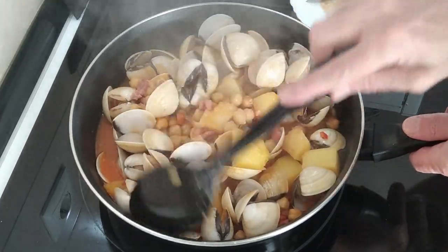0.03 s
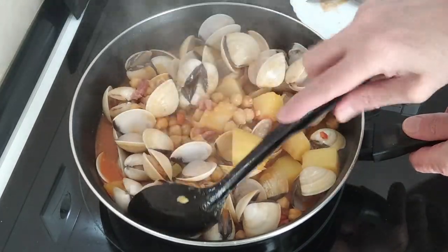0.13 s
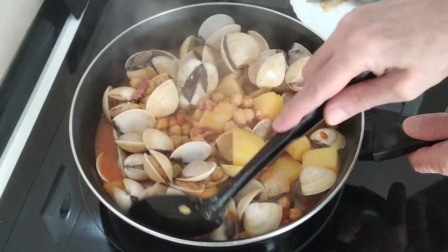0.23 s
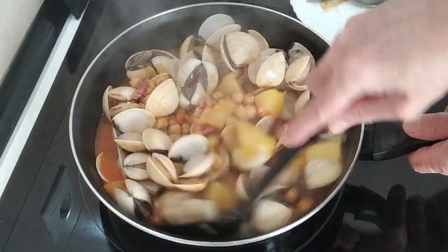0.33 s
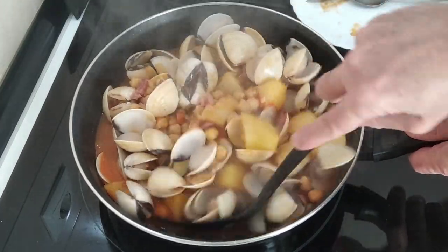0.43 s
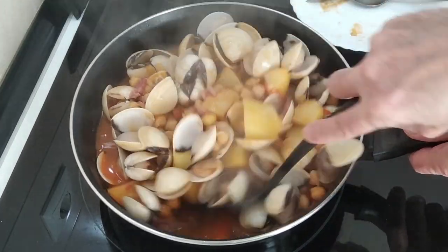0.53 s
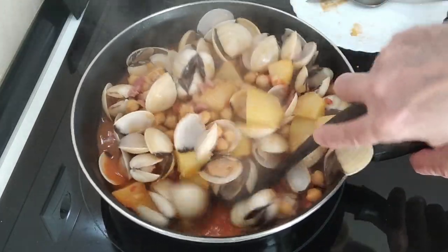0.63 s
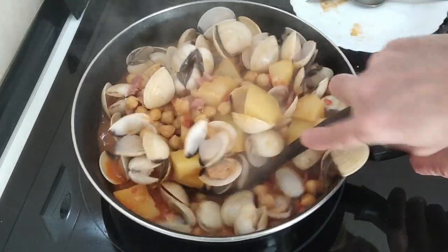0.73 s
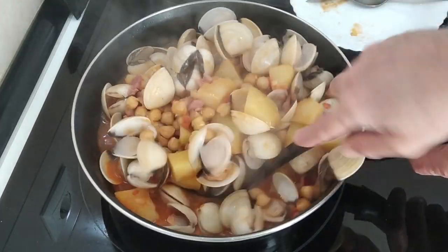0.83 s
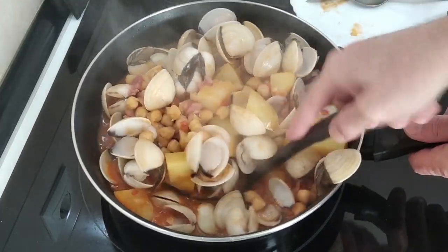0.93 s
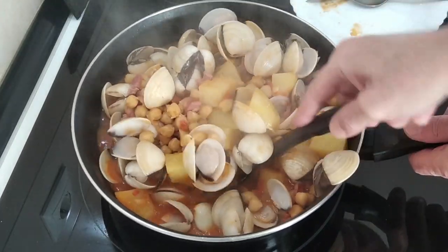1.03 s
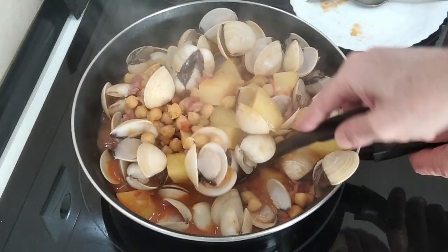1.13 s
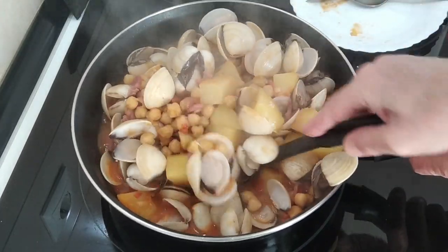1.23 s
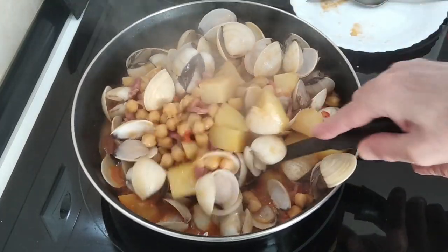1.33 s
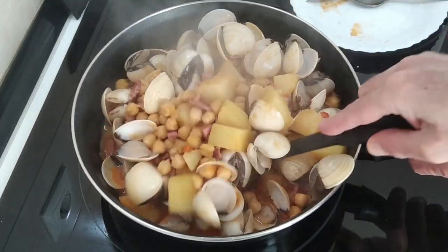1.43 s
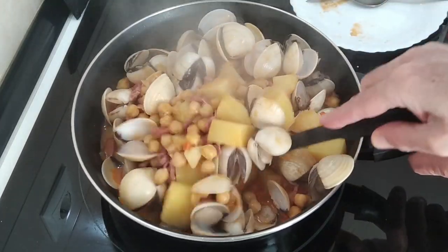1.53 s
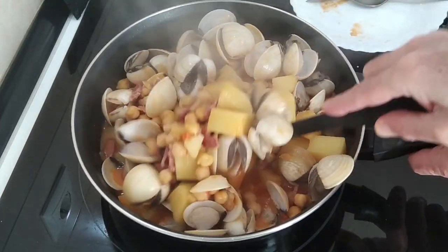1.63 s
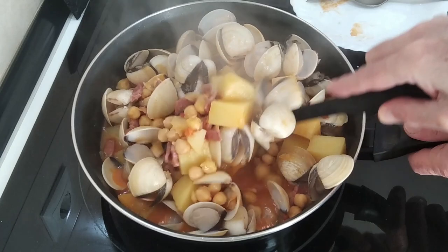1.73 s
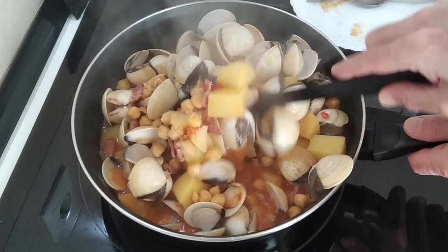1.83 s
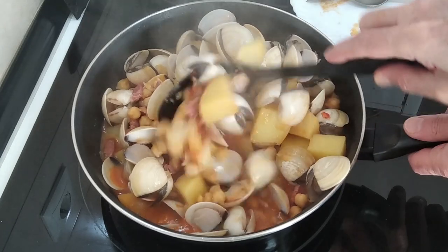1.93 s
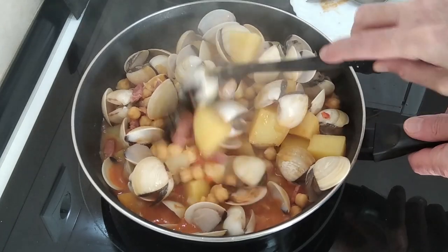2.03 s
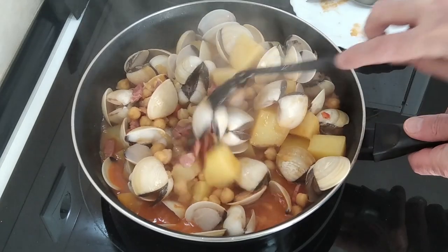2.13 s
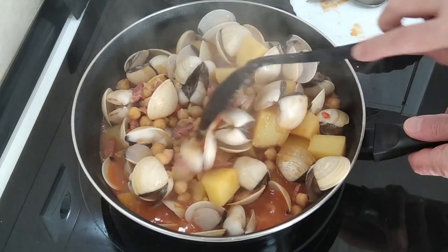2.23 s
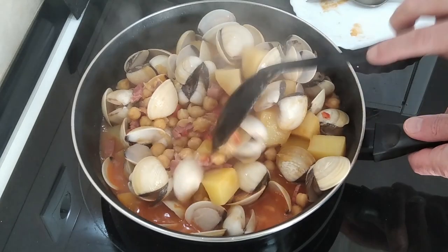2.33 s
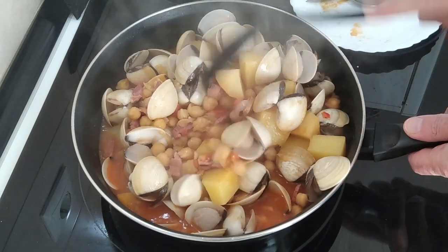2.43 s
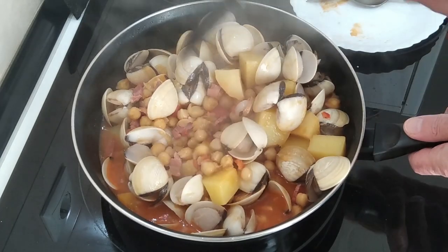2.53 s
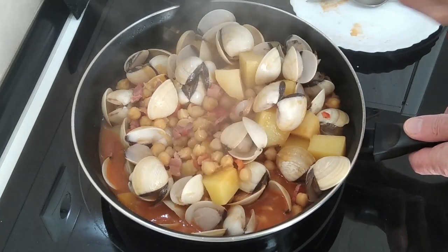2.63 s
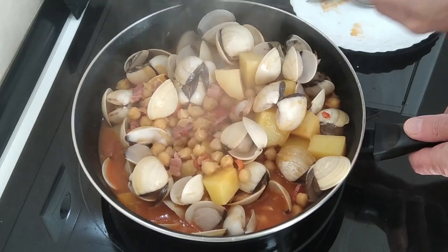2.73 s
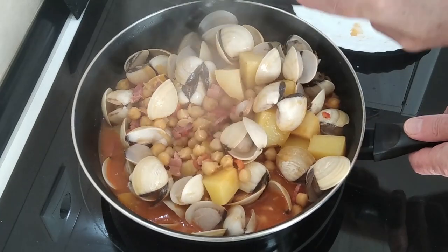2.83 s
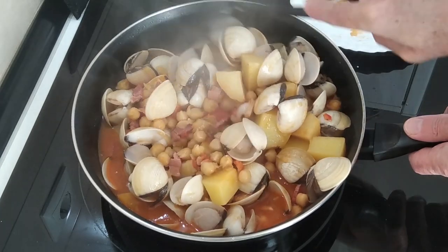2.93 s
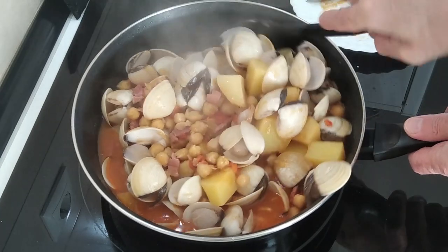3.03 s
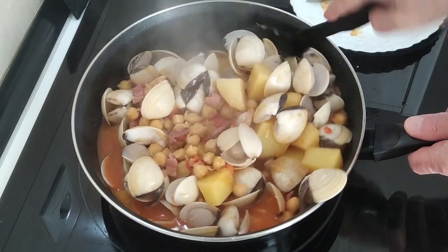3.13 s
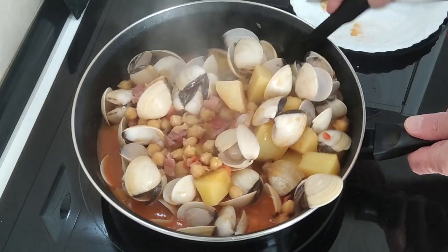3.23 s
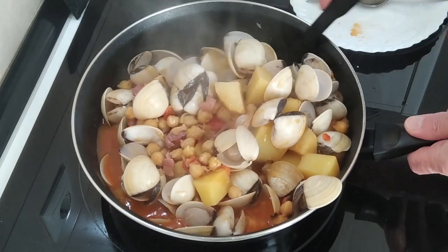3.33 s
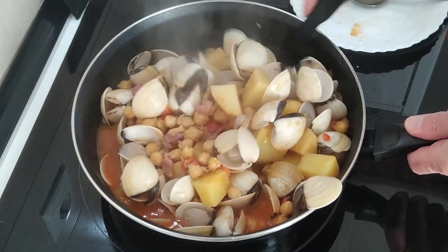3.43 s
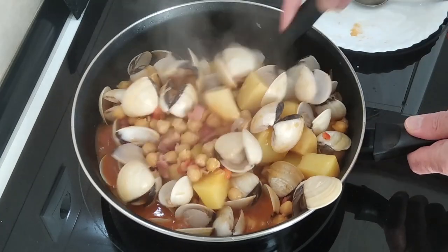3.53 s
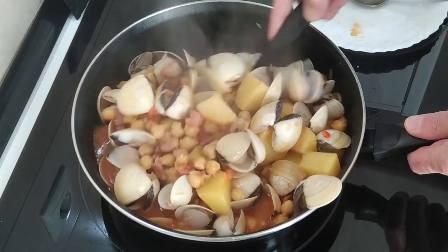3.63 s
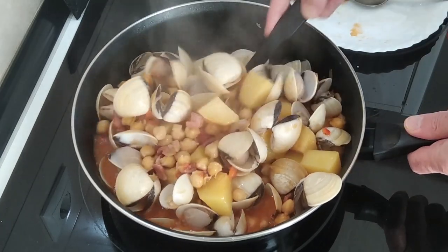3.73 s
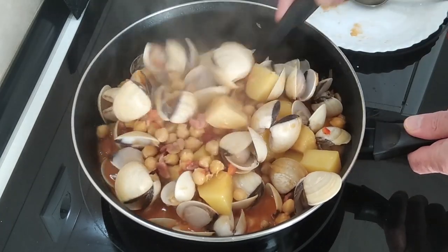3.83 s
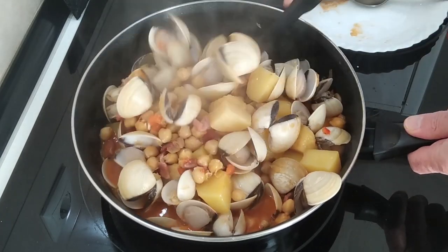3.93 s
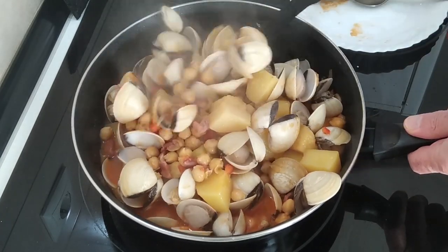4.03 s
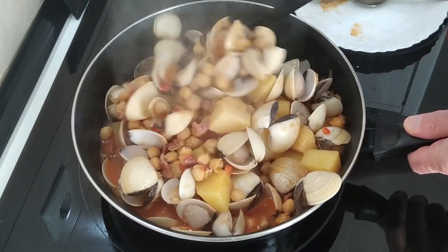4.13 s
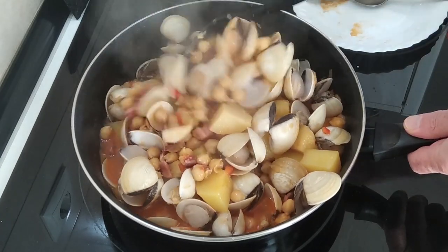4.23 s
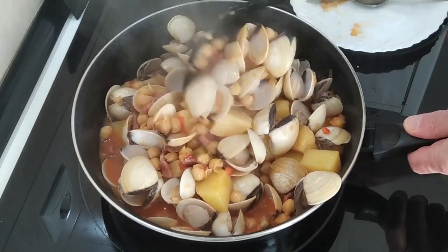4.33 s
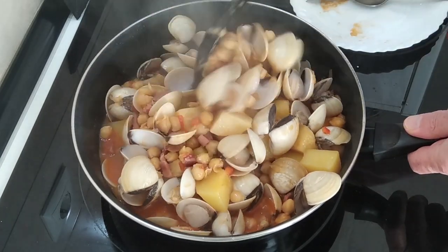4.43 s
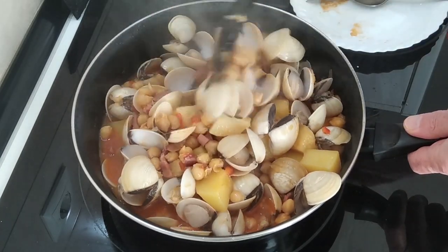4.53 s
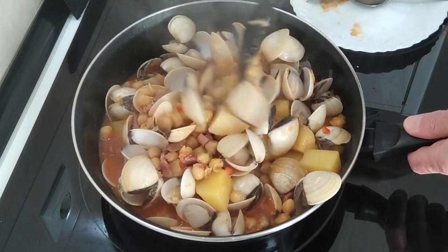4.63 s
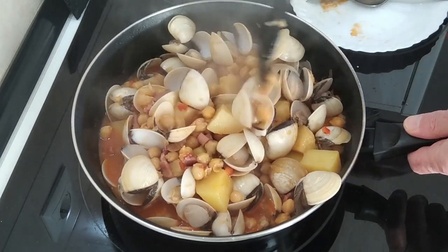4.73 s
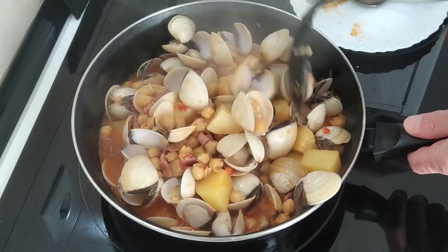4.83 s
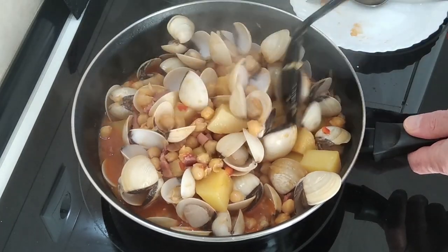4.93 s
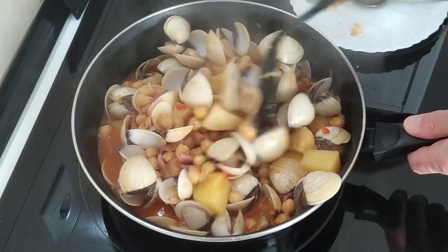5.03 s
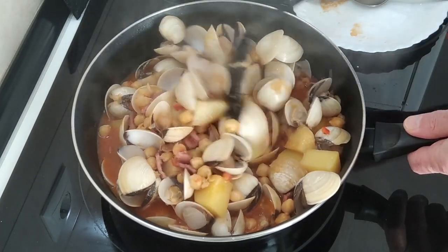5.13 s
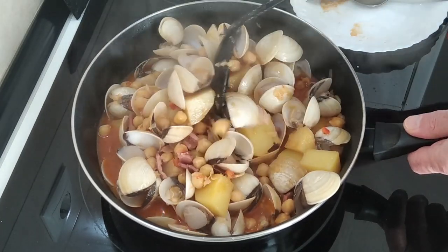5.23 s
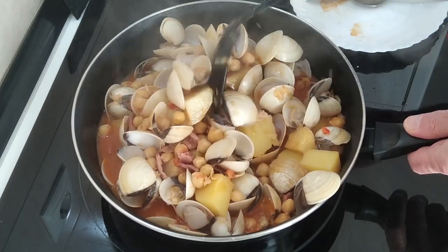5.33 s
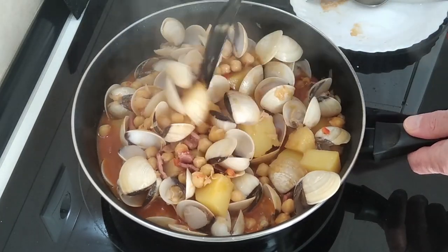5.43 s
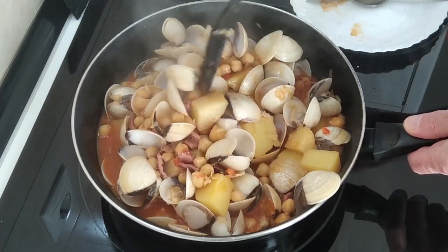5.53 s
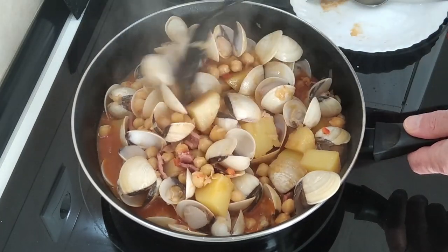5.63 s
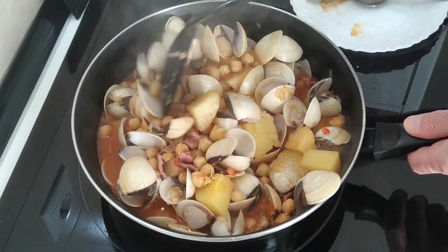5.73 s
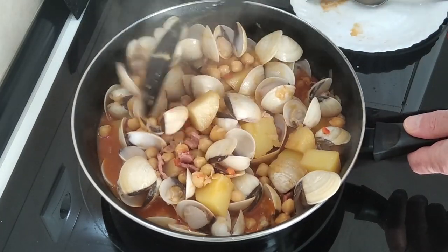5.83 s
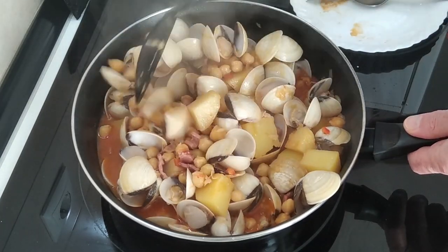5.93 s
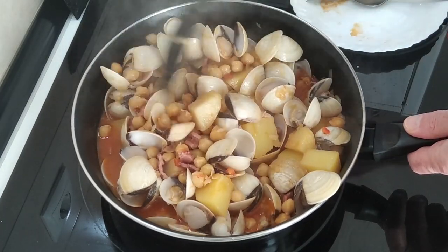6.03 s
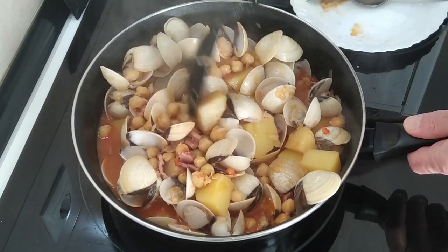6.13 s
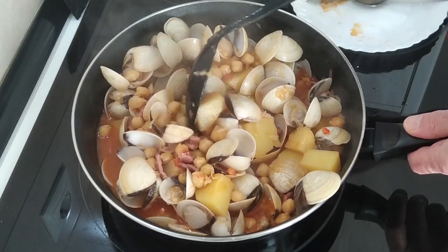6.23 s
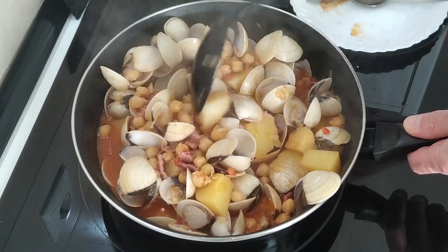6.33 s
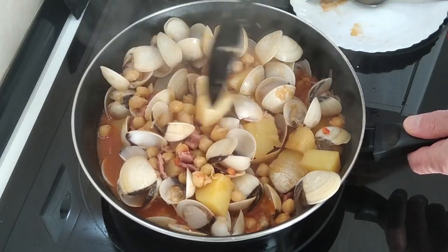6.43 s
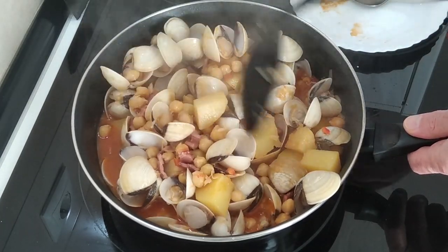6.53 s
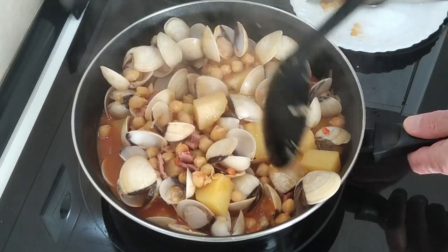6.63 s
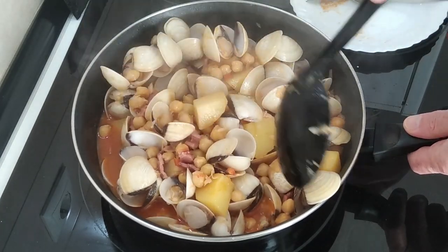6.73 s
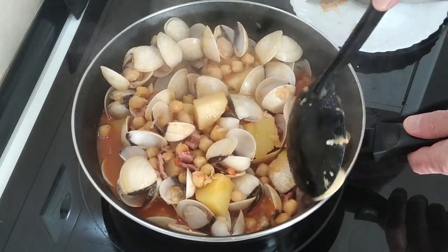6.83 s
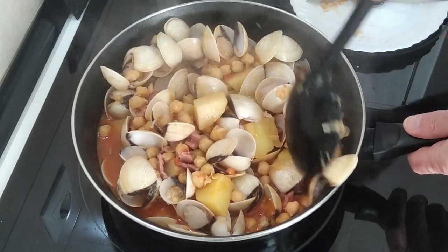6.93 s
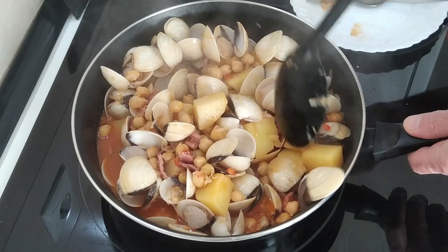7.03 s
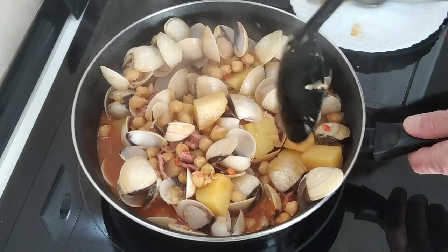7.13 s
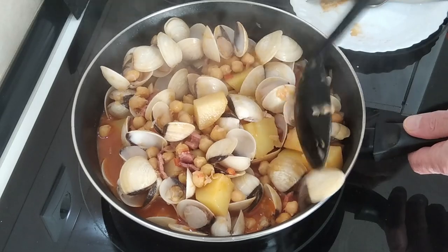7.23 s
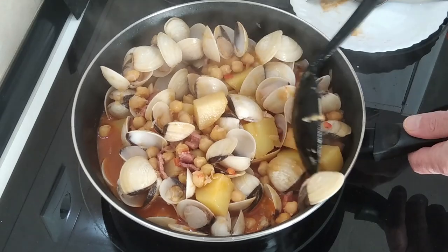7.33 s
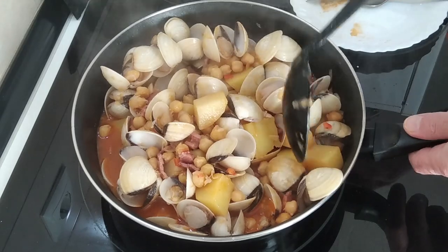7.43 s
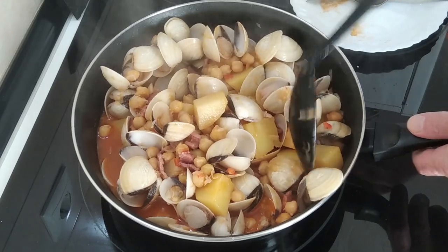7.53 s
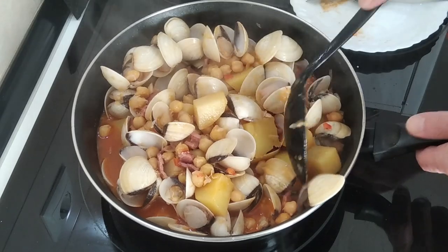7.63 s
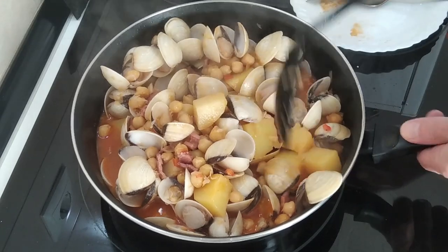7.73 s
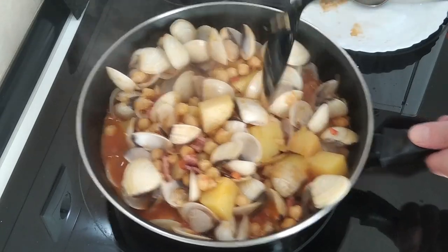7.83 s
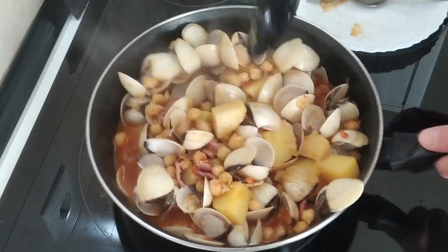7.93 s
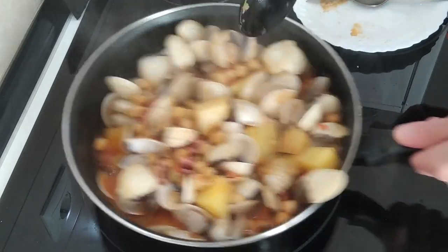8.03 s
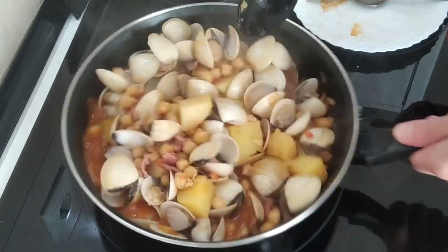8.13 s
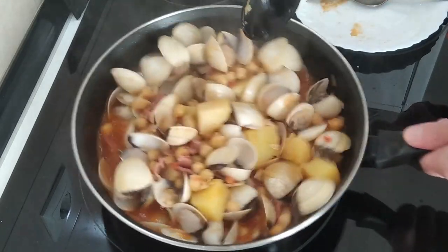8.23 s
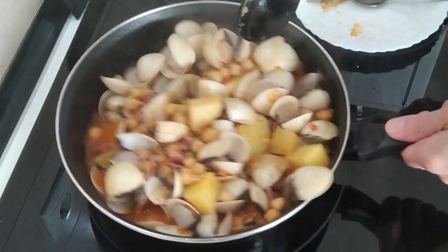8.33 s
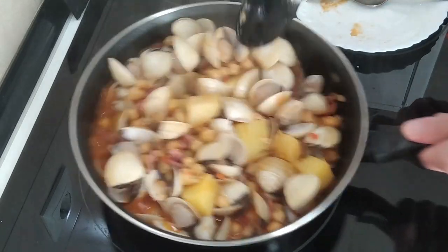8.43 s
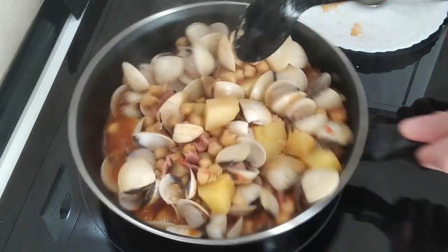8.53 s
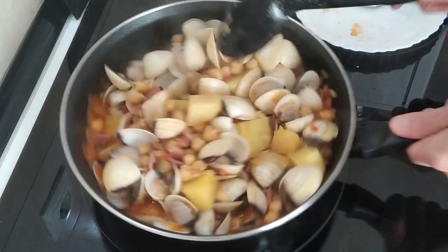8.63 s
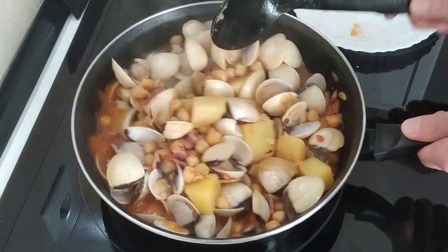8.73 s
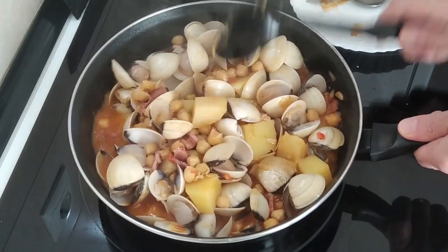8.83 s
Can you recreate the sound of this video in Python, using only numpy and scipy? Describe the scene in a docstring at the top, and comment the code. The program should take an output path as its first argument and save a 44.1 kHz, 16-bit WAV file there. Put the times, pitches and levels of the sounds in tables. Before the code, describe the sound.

Clam shells clack, ring and grate as a plastic spoon pushes through a simmering stew, under a steady extractor hood hum, ending with a pan shake.

```python
"""An extractor hood hums and sauce fizzes as a spoon begins to push through clams, potatoes and chickpeas.
Shells clack, ring and grate on each other, the spoon knocks the pan, and the pan is shaken at the end.
Shells and pan are decaying tones and noise bursts; grating and sauce are many tiny ringing contacts.
Hood, fizz and rumble are shaped noise; a small kitchen echoes, and two microphone ports colour the treble."""
import sys
import numpy as np
from scipy import signal
from scipy.fft import rfft, irfft, next_fast_len
from scipy.io import wavfile
from scipy.ndimage import uniform_filter1d

SR = 44100
rng = np.random.default_rng(int(sys.argv[2]) if len(sys.argv) > 2 else 0)


def transcribe(signal):
    """Save signal, clipped to [-1, 1], as a 16-bit WAV file at the path in sys.argv[1]."""
    frames = np.atleast_2d(signal).T
    limited = np.clip(frames, -1, 1)
    pcm = np.round(limited * 32767).astype(np.int16)
    wavfile.write(sys.argv[1], SR, pcm)


N = 391593  # length of the scene in samples
TIME_S = np.arange(N) / SR
CUTOFF_HZ = 14500  # top of the treble
HIT_SIZE = 8192  # samples kept for each short sound
HIT_TIME_S = np.arange(HIT_SIZE) / SR


def from_db(db):
    """Turn decibels into gain."""
    return 10 ** (np.asarray(db) / 20)


def rms_one(x):
    """Scale a sound to an average (rms) level of 1."""
    return x / np.sqrt(np.mean(x ** 2) + 1e-20)


def unit_hit(x):
    """Give a hit as much energy as 10 ms of sound at rms 1, so hits of any length compare fairly."""
    reference_s = .01
    return rms_one(x) * np.sqrt(reference_s * SR / x.shape[-1])


def at_hz(points, hz):
    """Read a table between its rows, with frequency on a log axis as in hearing."""
    table_hz, value = np.transpose(points)
    return np.interp(np.log(np.maximum(hz, 1)), np.log(table_hz), value)


def level(curve):
    """Gain at every sample from rows of time_s, level_db."""
    return from_db(np.interp(TIME_S, *np.transpose(curve)))


def dying(t, t60):
    """Exponential decay, 60 dB down after t60 seconds."""
    return np.exp(-np.log(1000) * t / t60)


def freqs(size):
    """Frequencies of the bins of a real FFT."""
    return np.arange(size // 2 + 1) * SR / size


def colour(x, points):
    """Filter to the response in rows of pitch_hz, level_db, without sounding ahead of time (minimum phase)."""
    size = 2 * next_fast_len(N // 2 + HIT_SIZE)
    # folding the cepstrum (spectrum of the log response) forward in time gives the minimum phase
    cepstrum = irfft(np.log(from_db(at_hz(points, freqs(size)))))
    cepstrum[1:size // 2] *= 2
    cepstrum[size // 2 + 1:] = 0
    response = np.exp(rfft(cepstrum))
    return irfft(rfft(x, size) * response)[..., :N]


def band(x, low_hz, high_hz):
    """Gentle band-pass."""
    return signal.sosfilt(signal.butter(2, [low_hz, high_hz], "band", fs=SR, output="sos"), x)


def ring(clicks, hz, t60):
    """Each click sets a decaying sine ringing, like a tap on something springy."""
    shrink = dying(1 / SR, t60)
    turn = 2 * np.pi * hz / SR
    # the tiny offset keeps the filter from slowing down on near-zero numbers
    return signal.lfilter([0, np.sin(turn)], [1, -2 * shrink * np.cos(turn), shrink ** 2], clicks + 1e-18)


def grains(per_s, spread_db, low_hz, high_hz, cycles, count):
    """Random tiny contacts of uneven size, each ringing one of several short resonances; stereo, rms 1."""
    born = np.flatnonzero(rng.random(N) < per_s / SR)
    sizes = from_db(spread_db * np.minimum(rng.exponential(1, len(born)), 4))
    chosen = rng.integers(0, count, len(born))
    at_ports = rng.standard_normal((2, len(born)))
    out = 0
    for k, hz in enumerate(np.geomspace(low_hz, high_hz, count)):
        clicks = np.zeros((2, N))
        clicks[:, born] = sizes * at_ports * (chosen == k)
        # t60 lasts a fixed number of cycles; higher resonances are louder
        out = out + ring(clicks, hz, cycles / hz) * hz / low_hz
    return rms_one(out)


def add(out, s, sound):
    """Mix a short sound in at time s."""
    start = round(s * SR)
    out[..., start:start + HIT_SIZE] += sound


def hood(air_db=-41.0):
    """Rushing air and narrow fan and duct resonances, alike at both ports in the bass."""
    # shape of the air noise: pitch_hz, level_db per Hz (relative)
    air_shape = [(15, -20), (30, 11), (46, -11.5), (70, 0), (90, -8), (125, 3), (200, -7.5), (280, -4.5),
                 (400, -4), (640, -9), (900, -15), (2000, -21), (4000, -28), (12000, -28.5)]
    # fan and duct resonances: pitch_hz, half_width_hz, level_db
    duct_modes = [(31, 7, -53.5), (70.3, 3.9, -56), (153.17, 1.15, -51.5), (275.8, 28, -46),
                  (343, 4, -55.5), (475.6, 8.3, -55.5), (633.7, 16.4, -54.5)]
    # how alike the hood is at the two ports: pitch_hz, likeness (0 to 1)
    likeness = [(60, 0.93), (130, 0.99), (290, 0.92), (640, 0.72), (1400, 0.15), (3000, 0.03)]
    size = 2 * next_fast_len(N // 2 + 1)
    hz = freqs(size)
    power = (from_db(air_db) * rms_one(from_db(at_hz(air_shape, hz)))) ** 2
    for centre, half_width, db in duct_modes:
        power += (from_db(db) * rms_one(1 / (1 + ((hz - centre) / half_width) ** 2))) ** 2
    alike = at_hz(likeness, hz)
    mid, side = rfft(rng.standard_normal((2, size)))
    # mid and side together lift all the levels above by 3 dB
    ports = np.sqrt(1 + alike) * mid + np.sqrt(1 - alike) * side * [[1], [-1]]
    return irfft(np.sqrt(power) * ports)[:, :N]


def simmer(level_db=-42.0, spit_db=0.5):
    """Countless tiny bursts of steam merge into a soft, slightly uneven fizz."""
    # spectrum of the fizz: pitch_hz, level_db per Hz (relative)
    fizz = [(800, 1), (1500, 8.5), (3000, -20.5), (6000, 4.5), (9000, -7), (14000, 15)]
    unevenness = rms_one(uniform_filter1d(rng.standard_normal(N), size=40))
    bursts = rng.standard_normal((2, N)) * from_db(spit_db * unevenness)
    return from_db(level_db) * rms_one(colour(bursts, fizz))


def hob():
    """Bands of noise make a low rumble and the dull rub of the pan's base on the glass."""
    # a low rumble that swells towards the end: time_s, level_db
    rumble_curve = [(0, -57), (6.2, -55.5), (6.6, -43), (8.88, -38)]
    # the pan's rub on the hob, growing as it is shaken: time_s, level_db
    rub_curve = [(7.6, -47), (8.1, -43), (8.88, -40.5)]
    rumble = rms_one(band(rng.standard_normal(N), low_hz=59.7, high_hz=78.5))
    rub = rms_one(band(rng.standard_normal(N), low_hz=129, high_hz=510))
    return level(rumble_curve) * rumble + level(rub_curve) * rub


def kitchen(x, first_echo_s=0.0017, build_s=0.0011):
    """Hob, hood and tiles return a dense tail, shortest in the bass and shorter again in the top treble."""
    # reverberation time: pitch_hz, t60_s
    room_t60 = [(500, 0.06), (3000, 0.3), (7000, 0.3347), (13000, 0.23)]
    # reverberation against the direct sound: pitch_hz, level_db
    room_level = [(500, 2.5), (3000, -3), (7000, -3), (13000, -2.5)]
    t = np.arange(SR // 2) / SR
    onset = np.clip((t - first_echo_s) / build_s, 0, 1)
    edges = np.geomspace(350, CUTOFF_HZ, 9)
    response = 0
    for low, high in zip(edges, edges[1:]):
        hz = np.sqrt(low * high)
        envelope = rms_one(onset * dying(t, at_hz(room_t60, hz))) / np.sqrt(len(t))
        echoes = band(rng.standard_normal((2, len(t))), low, high)
        response = response + from_db(at_hz(room_level, hz)) * echoes * envelope
    return signal.fftconvolve(x, response, axes=1)[:, :N]


def effort():
    """Gains of the grating and of the sauce: every stroke swells, holds and dies away."""
    # pushes of the spoon through the food, and last the shake: start_s, end_s, grating_db, sauce_db
    strokes = [(0, 0.114, -52, -49), (0.363, 0.797, -48, -48.5), (1.6, 2.07, -54, -53.5),
               (2.974, 3.133, -52, -55), (3.51, 3.8, -49, -49.5), (4.1, 4.797, -46.5, -56),
               (4.85, 5.245, -47, -48.5), (5.677, 5.975, -42, -52), (6.943, 7.2, -70, -60),
               (7.604, 7.767, -53.5, -57), (8.066, 8.753, -41.5, -42)]
    attack_s, release_t60_s = 0.036, 0.79  # the food gives way quickly and settles slowly
    out = from_db(-63.5)  # between strokes the food still shifts a little
    for start_s, end_s, grit_db, sauce_db in strokes:
        swell = np.clip((TIME_S - start_s) / attack_s + .5, 0, 1)
        envelope = swell * dying(np.maximum(TIME_S - end_s, 0), release_t60_s)
        out = out + from_db([[grit_db], [sauce_db]]) * envelope
    return out


def stirring():
    """Shell edges grate past each other and the sauce squelches as the spoon pushes through."""
    # filter on the grating: pitch_hz, level_db (relative)
    grit_colour = [(1500, -30.5), (3000, 4), (5000, 2), (8000, 2), (14000, -7)]
    contacts = grains(per_s=270, spread_db=2.5, low_hz=2330, high_hz=13200, cycles=31, count=12)
    grit = rms_one(colour(contacts, grit_colour))
    sauce = grains(per_s=330, spread_db=-0.5, low_hz=830, high_hz=2580, cycles=8.8, count=8)
    grit_gain, sauce_gain = effort()
    return grit_gain * grit + sauce_gain * sauce


def scrapes(slips_per_s=350, spread_db=2.5, width=1.59, skirt_db=-4.0):
    """Stick and slip: a run of tiny uneven contacts, each a brief burst around the scrape's pitch."""
    # the spoon scrapes along the pan or over shells: start_s, end_s, level_db, centre_hz
    scrape_table = [(0.079, 0.135, -48, 1520), (0.404, .447, -29.5, 4700), (0.443, 0.461, -23, 2850),
                    (0.677, 0.72, -35.5, 3400), (2.812, 2.841, -33.5, 1260), (2.976, 3.021, -35.5, 1390),
                    (3.075, 3.127, -36.5, 1590), (3.432, 3.517, -46, 1500), (3.558, 3.64, -37.5, 5900),
                    (3.845, 3.97, -48, 3550), (4.184, 4.244, -36.5, 5830), (4.524, 4.555, -32, 6500),
                    (5.684, 5.728, -33.5, 5430), (5.901, 5.976, -40.5, 5500), (6.228, 6.26, -47, 2190),
                    (6.952, 6.976, -32.5, 7450), (8.331, 8.373, -34, 3970)]
    slip_t60_s = .006
    out = np.zeros((2, N + HIT_SIZE))
    for start_s, end_s, db, centre_hz in scrape_table:
        length = end_s - start_s
        slips = (rng.random(HIT_SIZE) < slips_per_s / SR) * (HIT_TIME_S < length)
        slips[0] = True  # every scrape begins with a slip
        sizes = from_db(spread_db * rng.standard_normal(HIT_SIZE))
        force = signal.lfilter([1], [1, -dying(1 / SR, slip_t60_s)], slips * sizes)
        edges = centre_hz / width, centre_hz * width
        core, skirt = band(force * rng.standard_normal((2, 2, HIT_SIZE)), *edges)
        # the core is filtered twice to narrow it; the skirt spreads wider
        sound = band(core, *edges) + from_db(skirt_db) * skirt
        add(out, start_s, from_db(db) * rms_one(sound) * np.sqrt(length / HIT_TIME_S[-1]))
    return out[:, :N]


def knock(hardness_db, tilt_share=0.21, scatter_db=5.5, detune=0.059, port_phase=0.51):
    """The pan's modes, struck in a new place each time: brightly by a hard shell, dully by the plastic spoon."""
    # the loaded pan, damped by the food, before each knock's scatter: pitch_hz, level_db, t60_s
    pan_modes = [(835, -4, 0.074), (1090, 8, 0.011), (1225, -8.5, 0.028), (1245, 0, 0.084),
                 (1540, 6.5, 0.026), (1937, 2.5, 0.056), (2274, 0.5, 0.011), (2480, 8, 0.036),
                 (3280, -18, 0.015)]
    hz, db, t60 = np.transpose(pan_modes)[:, :, None]
    strength, shift, left, right = rng.standard_normal((4, len(hz), 1))
    phase = 2 * np.pi * hz * (1 + detune * shift) * HIT_TIME_S + port_phase * np.array([left, right])
    tilt_db = tilt_share * hardness_db * np.log2(hz / hz[0])
    gains = rng.choice([-1, 1], hz.shape) * from_db(db + scatter_db * strength + tilt_db)
    return unit_hit((gains * np.sin(phase) * dying(HIT_TIME_S, t60)).sum(axis=1))


def shell(hz, spread=0.0495, overtone=2.0, count=5):
    """One shell rings, with an overtone, amid like-sized neighbours; each port hears its own phases."""
    overtone_db, neighbours_db = -9.0, -3.5
    t60_s = .019  # at the shell's own pitch; higher partials die sooner
    partials = hz * np.r_[1, overtone, 1 + spread * rng.standard_normal(count)][:, None]
    gains = from_db(np.r_[0, overtone_db, np.full(count, neighbours_db)])[:, None]
    gains = gains * (partials < CUTOFF_HZ)
    sines = np.sin(2 * np.pi * (partials * HIT_TIME_S + rng.random((2, len(partials), 1))))
    return unit_hit((gains * sines * dying(HIT_TIME_S, t60_s * hz / partials)).sum(axis=1))


def clack(brightness, chatter_t60, low_hz=2200, slip_db=1.0, lumps_db=2.5):
    """A noise burst for dense shell modes, bunched anew at every touch; longer chatter also builds more slowly."""
    hz = freqs(HIT_SIZE) + 1
    # brightness tilts the spectrum in dB per octave; below low_hz it falls away
    shape = from_db(brightness * np.log2(hz / low_hz)) / np.sqrt(1 + (low_hz / hz) ** 4)
    shape = shape * (hz < CUTOFF_HZ)
    lumps = np.interp(hz, np.linspace(0, CUTOFF_HZ, 36), rng.standard_normal(36))
    noise = rfft(rng.standard_normal((2, HIT_SIZE)))
    dense_modes = irfft(noise * shape * from_db(lumps_db * lumps))
    slips = rms_one(uniform_filter1d(rng.standard_normal(HIT_SIZE), size=70))
    rise = 1 - np.exp(-HIT_TIME_S / (.025 * chatter_t60))
    return unit_hit(dense_modes * rise * dying(HIT_TIME_S, chatter_t60) * from_db(slip_db * slips))


def shell_hit(shell_hz, ring_db, brightness, chatter_t60, pan_db):
    """A shell clacks, knocks the pan beneath and rings; returns the blow and the ring, which share the energy."""
    blow = clack(brightness, chatter_t60) + from_db(pan_db) * knock(hardness_db=-pan_db)
    ringing = from_db(ring_db) * shell(shell_hz)
    return np.array([blow, ringing]) / np.hypot(1, from_db(ring_db))


def spoon_knocks(gain_db=-9.5, loose_shell_hz=5700, loose_shell_db=-16.0):
    """The plastic spoon strikes the pan dully and sets a loose shell ringing."""
    # the spoon knocks the pan: start_s, level_db (relative, before gain_db)
    knock_table = [(0.182, -28), (0.435, -17.5), (0.768, -24), (2.85, -21), (2.979, -30), (3.524, -24.5),
                   (3.684, -25), (4.074, -15), (4.56, -24), (4.632, -23.5), (4.922, -24.5), (5.009, -28),
                   (6.869, -24.5), (6.975, -19.5), (7.31, -18), (7.624, -26), (8.358, -19.5),
                   (8.444, -18.5)]
    out = np.zeros((2, N + HIT_SIZE))
    for s, db in knock_table:
        ringing = from_db(loose_shell_db) * shell(loose_shell_hz, spread=.015)
        add(out, s, from_db(db + gain_db) * (knock(hardness_db=-2.0) + ringing))
    return out[:, :N]


def tumbles(gain_db=-8.5, pitch_spread=0.165, count=2):
    """The first shell of a heap lands hardest; another of about its size follows after an uneven gap."""
    # shells tumble onto the pan: start_s, level_db (relative, before gain_db), first_shell_hz,
    # chatter_t60_s, brightness (dB per octave)
    tumble_table = [(0.4349, -2.5, 9620, 0.041, 4.5), (2.4603, -15, 9050, 0.044, 3),
                    (4.2598, -13.5, 8360, 0.028, 4.5), (4.5439, -6, 5160, 0.035, 6),
                    (4.559, -6.5, 5130, 0.039, -0.5), (5.6725, -18.5, 4040, 0.035, 0),
                    (5.9737, -4.5, 6320, 0.047, 1), (8.0936, -11.5, 6490, 0.019, -1.5),
                    (8.1678, -6.5, 3270, 0.029, 1), (8.3578, -15.5, 2940, 0.048, -1.5),
                    (8.4507, -7, 8550, 0.022, 1), (8.5925, -7, 6640, 0.023, -4),
                    (8.6174, -8.5, 7770, 0.087, -2), (8.7084, -6, 6570, 0.043, -1.5)]
    ring_db, pan_db = -8.5, -15.5  # against the clack
    mean_gap_s, loss_db = .016, 9  # the next shell lands later and softer
    out = np.zeros((2, 2, N + HIT_SIZE))
    for s, db, shell_hz, chatter_t60, brightness in tumble_table:
        for k in range(count):
            hit = shell_hit(shell_hz, ring_db, brightness, chatter_t60, pan_db)
            add(out, s, from_db(db + gain_db - k * loss_db) * hit)
            s = s + mean_gap_s * (.5 + rng.random())
            shell_hz = shell_hz * np.exp(pitch_spread * rng.standard_normal())
    return out[..., :N]


def clinks(gain_db=-10.5):
    """Single shells strike each other; light, glancing touches chatter longer than hard ones."""
    # one shell clinks on another: start_s, level_db (relative, before gain_db), shell_hz,
    # ring_db (against the clack), brightness (dB per octave)
    clink_table = [(.181, -27.5, 3000, -9, -10.5), (.368, -21, 3400, -12, -4), (.46, -1, 3330, -13, 16),
                   (.482, -9.5, 3700, -2, 17), (.623, -19.5, 5170, 4.5, -1.5), (.702, -6.5, 5820, -3.5, 2),
                   (0.766, -13.5, 5400, -8, 1), (.831, -3.5, 6550, -3.5, 4.5),
                   (1.306, -25.5, 4570, 3, -3.5), (1.366, -24.5, 6150, 4, -4), (1.397, -11, 9070, 3, 4.5),
                   (1.601, -6, 5890, -1.5, -0.5), (1.624, -13.5, 3180, 2, -1), (1.674, -12, 7670, 3, -0.5),
                   (1.898, -18.5, 6600, 6, -5), (1.9405, -4.5, 7720, 5, 1), (1.941, -13, 3500, 11, 5),
                   (1.972, -13.5, 3470, -5, -1.5), (1.995, -19, 7970, -1, 6), (2.01, 0, 8120, 4, 5),
                   (2.285, -13.5, 6230, -4, 5.5), (2.447, -24, 6400, -1, -1), (2.4599, -12, 9780, 6, 6),
                   (2.813, -17, 6400, -8, 3), (3.008, -24.5, 5650, -5, -3), (3.102, -24, 5700, -3, -5),
                   (3.137, -25, 3320, 2, -13), (3.254, -26, 4260, -4, -6), (3.307, -19, 5320, -2, -2.5),
                   (3.524, -19, 3400, -10, -11), (3.536, -7.5, 9330, -6, 3), (3.609, -15, 7130, -5, -1),
                   (3.653, -10, 8260, 5.5, -6), (3.683, -12.5, 3800, -17, -0.5), (3.706, -14, 4840, -5, 2),
                   (3.723, -11, 6850, 4, 6), (3.991, -23, 6440, 2, -3), (4.0751, 0, 5560, 2, 2.5),
                   (4.076, -10, 9260, 12, 6), (4.095, -10, 5660, 3, -4), (4.345, -15.5, 6820, 7, 0),
                   (4.347, -19, 8000, 8, 0), (4.372, -16, 4900, -2, 3), (4.42, -14, 9450, -9, 3),
                   (4.47, -19, 3750, 0, 1), (4.498, -22, 7250, -5, -2), (4.632, -14, 6970, -1, -1),
                   (4.746, -6.5, 6200, -7, 7.5), (4.764, -9, 6850, -6, 3.5), (4.852, -17, 6540, -2, 3),
                   (4.923, -23, 3850, -7, 1), (5.008, -24.5, 3050, -15, 0), (5.057, -18.5, 6640, -5, -8),
                   (5.159, -16, 5340, -7, -4.5), (5.213, -20, 7170, 11, -7), (5.665, -14, 6900, 1.5, 2),
                   (5.75, -19.5, 6680, 5, -4), (5.809, -21.5, 5000, -10, -2.5),
                   (5.918, -17.5, 9300, -5, -1), (5.963, -6.5, 6900, -3, 3.5), (6.87, -21, 3080, 2.5, -2.5),
                   (6.973, -15, 4070, -6, -3.5), (7.059, -13.5, 7730, 7, -4.5), (7.101, -28, 5700, 0, -10),
                   (7.148, -32, 5800, 4, -11), (7.311, -18, 5760, -6, -6.5), (7.624, -22.5, 5660, 1, -2),
                   (7.683, -17.5, 5600, 6.5, -6), (8.05, -11.5, 7570, 1.5, 5), (8.139, -15.5, 6500, 0, 1),
                   (8.21, -16, 7450, -3, 4), (8.405, -15, 5760, 4, 3), (8.445, -13, 9100, -3, 4),
                   (8.564, -14.5, 6550, -3, 2.5)]
    middling_db, middling_t60_s = -15.5, 0.036  # a middling clink and its chatter
    shortening = .2  # dB of chatter time lost per dB of level
    out = np.zeros((2, 2, N + HIT_SIZE))
    for s, db, shell_hz, ring_db, brightness in clink_table:
        chatter_t60 = middling_t60_s * from_db(shortening * (middling_db - db))
        hit = shell_hit(shell_hz, ring_db, brightness, chatter_t60, pan_db=-27.5)
        add(out, s, from_db(db + gain_db) * hit)
    return out[..., :N]


def scene():
    """The stirred pan in its kitchen, over the simmer and the hood; the rings sound drier than the blows."""
    ring_room_db = -5.0  # the rings send less into the room
    blows, rings = clinks() + tumbles()
    pan = blows + spoon_knocks() + scrapes() + stirring()
    echoes = kitchen(pan + from_db(ring_room_db) * rings)
    return pan + rings + echoes + simmer() + hood() + hob()


def record(dry):
    """Each port has its own treble resonance; the highest peaks are clipped and the top is cut."""
    # colour of each microphone port: pitch_hz, level_db
    left_port = [(1000, -2.5), (2500, 1.5), (4000, 2), (5700, -3.5), (7000, 1), (9400, 5.5), (11500, -7.5),
                 (14000, -18)]
    right_port = [(1000, -1.77), (2500, 2.5), (4000, 2.5), (5700, 5), (7500, 1), (9400, -10), (11500, -15),
                  (14000, -22.5)]
    ports = np.array([colour(dry[0], left_port), colour(dry[1], right_port)])
    clipped = np.clip(ports, -.85, .85)
    return signal.sosfilt(signal.ellip(8, .2, 80, CUTOFF_HZ, fs=SR, output="sos"), clipped)


dry = scene()
out = record(dry)
transcribe(out)
```